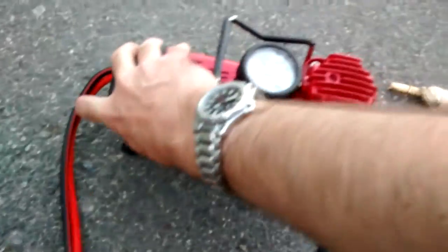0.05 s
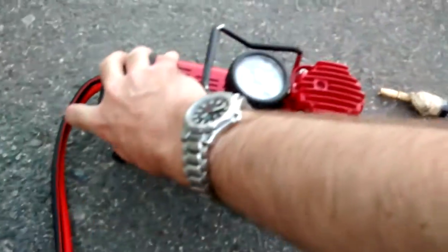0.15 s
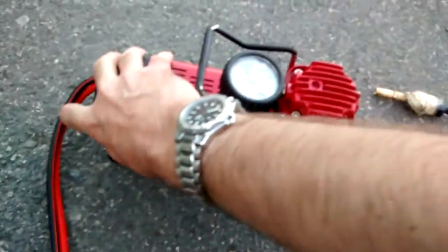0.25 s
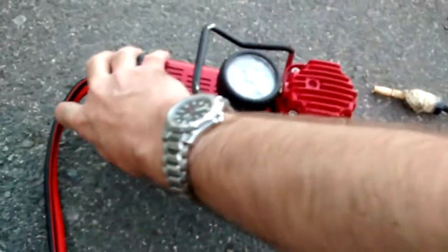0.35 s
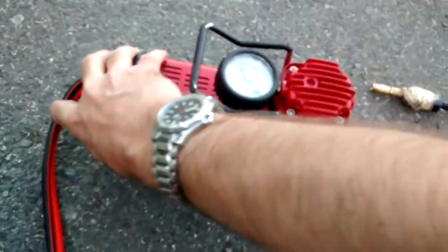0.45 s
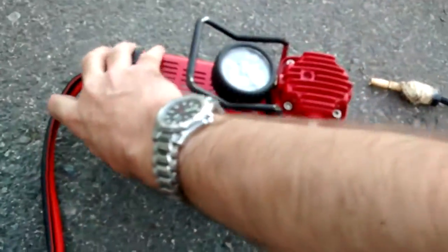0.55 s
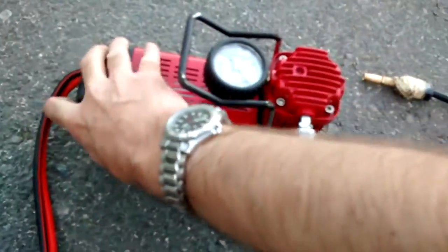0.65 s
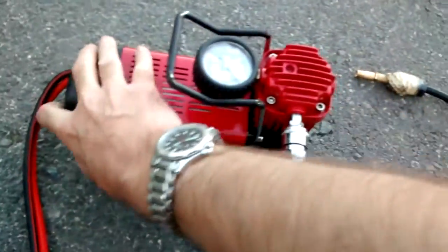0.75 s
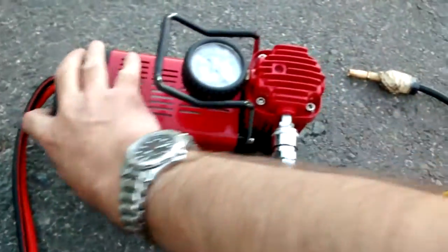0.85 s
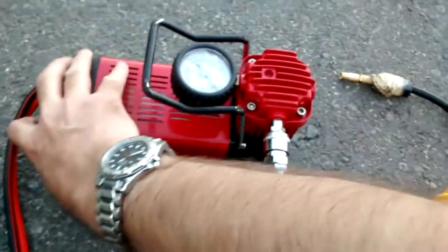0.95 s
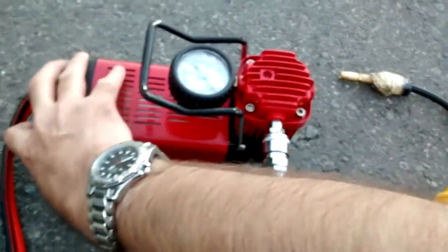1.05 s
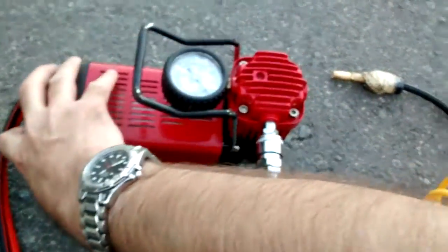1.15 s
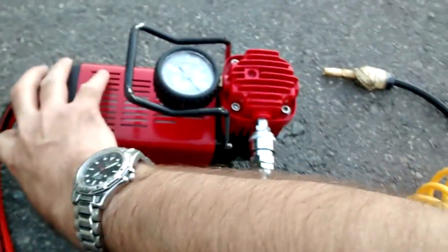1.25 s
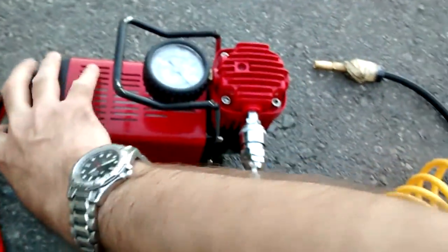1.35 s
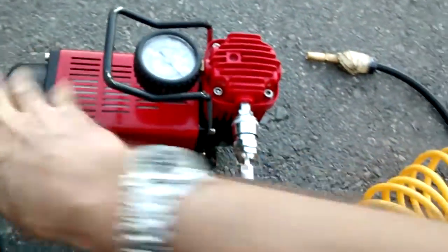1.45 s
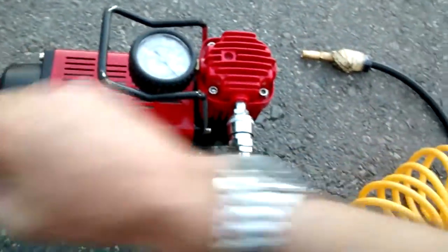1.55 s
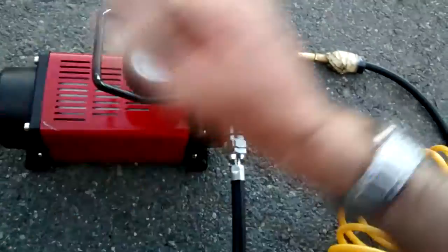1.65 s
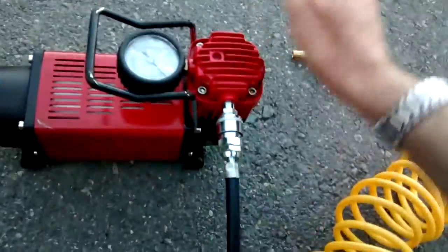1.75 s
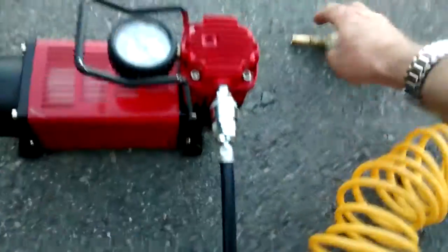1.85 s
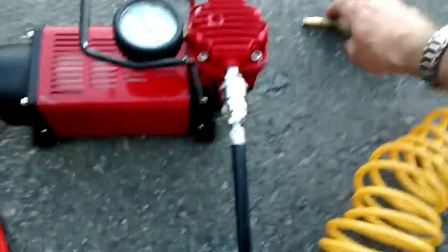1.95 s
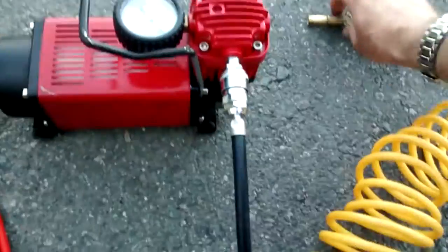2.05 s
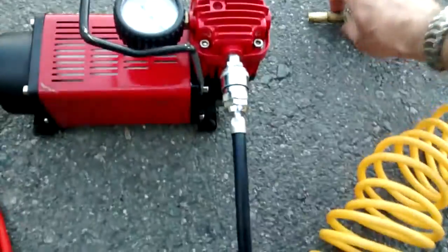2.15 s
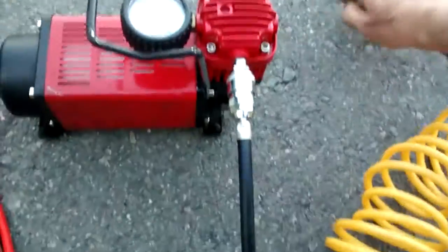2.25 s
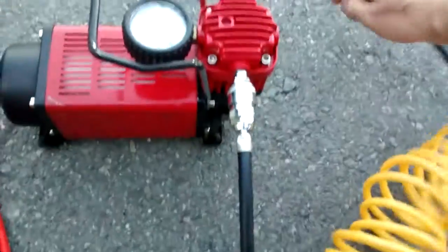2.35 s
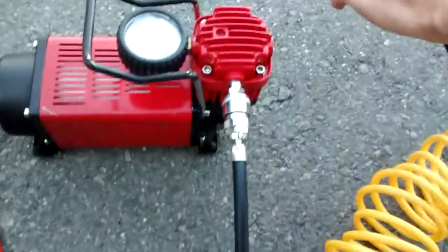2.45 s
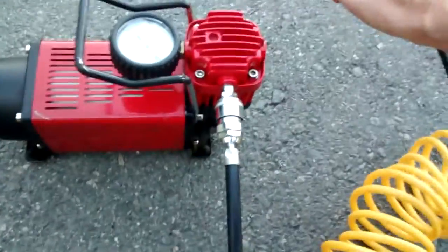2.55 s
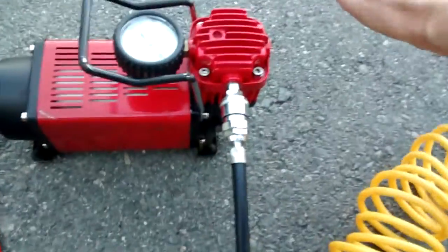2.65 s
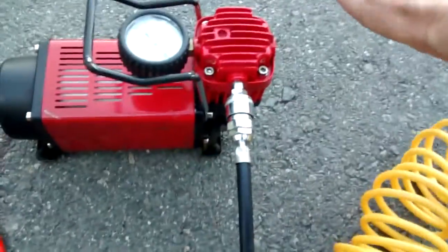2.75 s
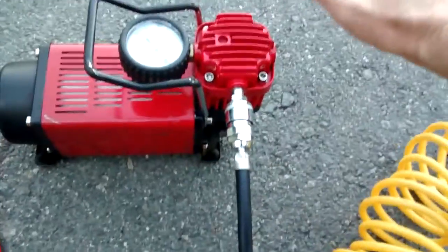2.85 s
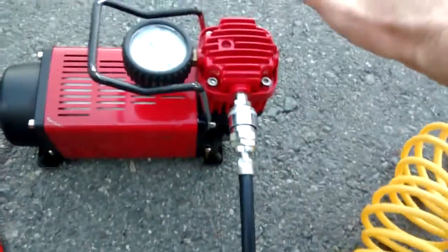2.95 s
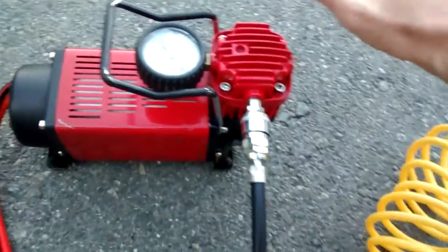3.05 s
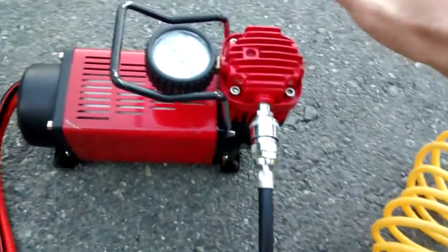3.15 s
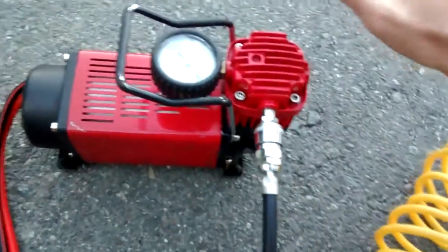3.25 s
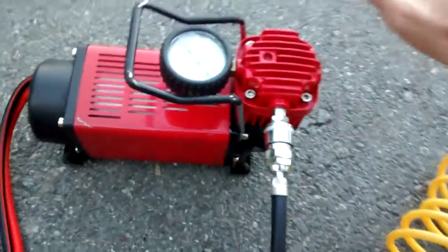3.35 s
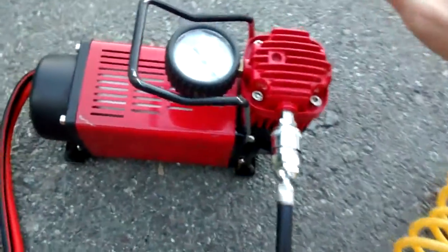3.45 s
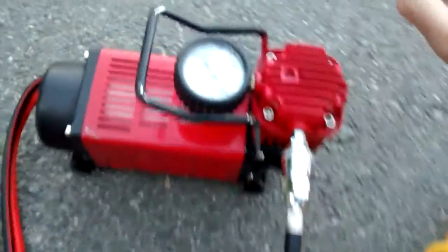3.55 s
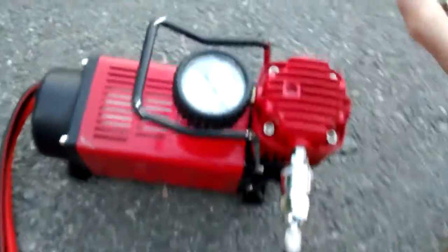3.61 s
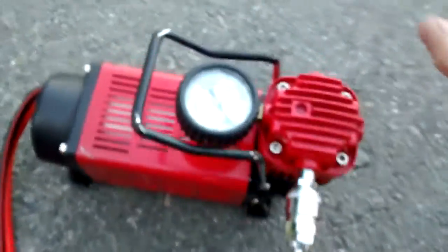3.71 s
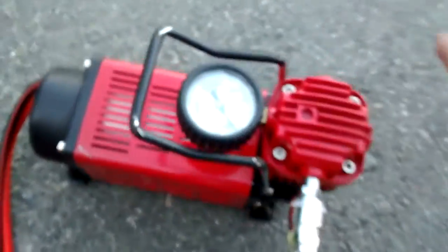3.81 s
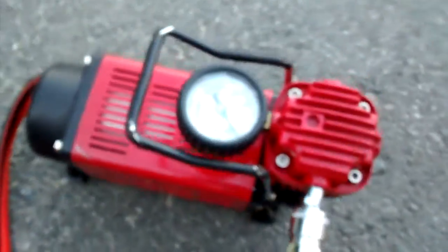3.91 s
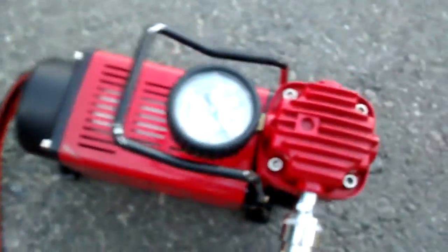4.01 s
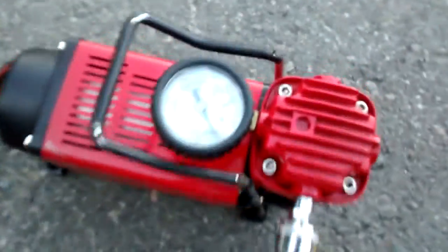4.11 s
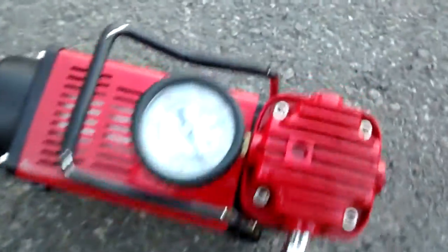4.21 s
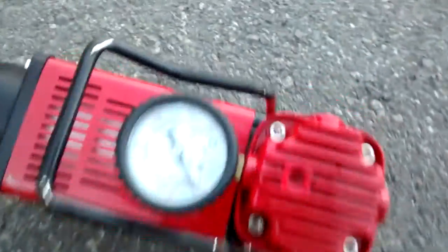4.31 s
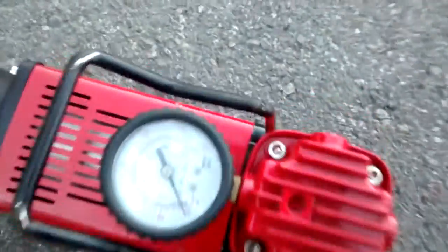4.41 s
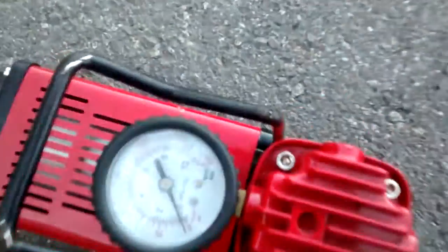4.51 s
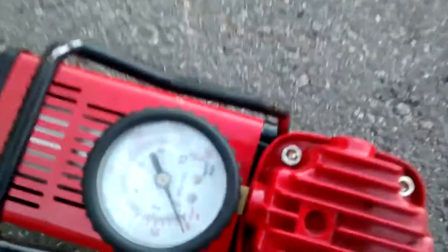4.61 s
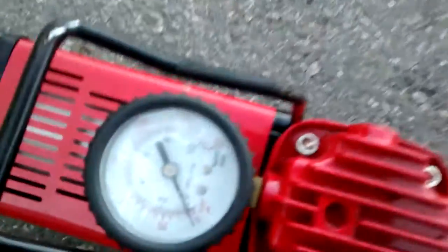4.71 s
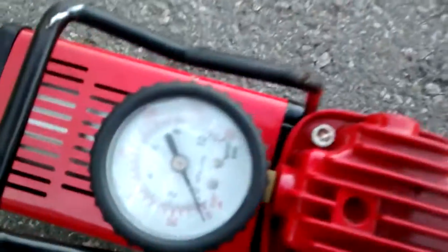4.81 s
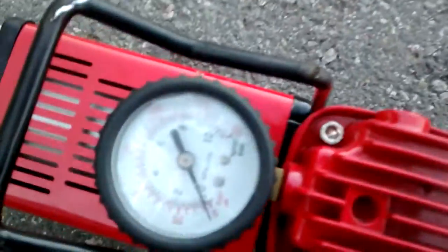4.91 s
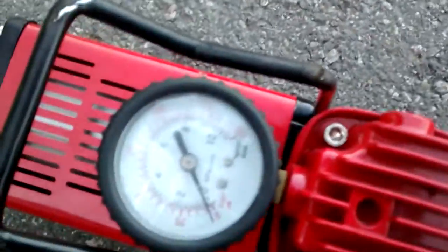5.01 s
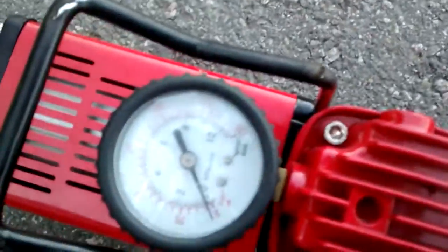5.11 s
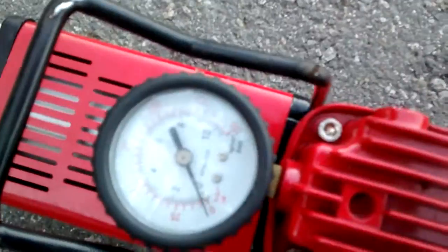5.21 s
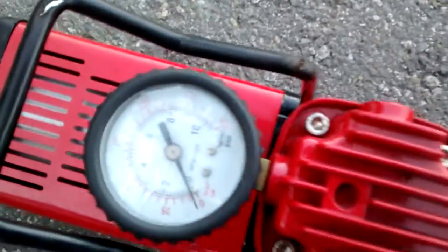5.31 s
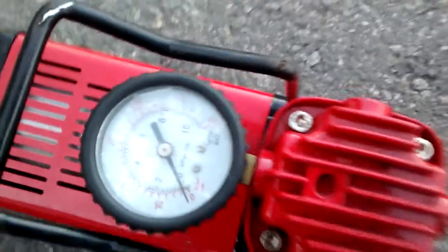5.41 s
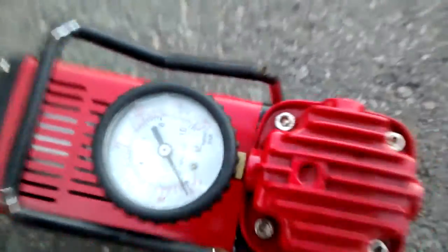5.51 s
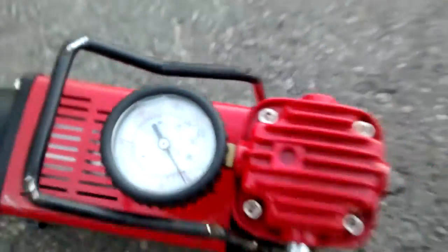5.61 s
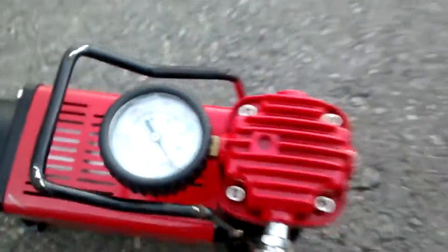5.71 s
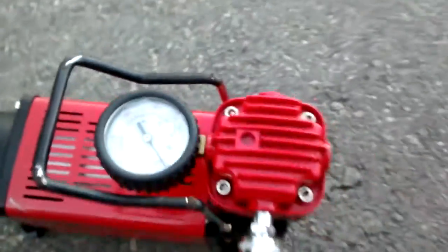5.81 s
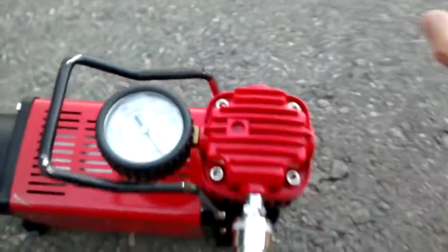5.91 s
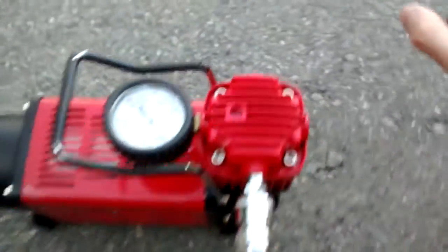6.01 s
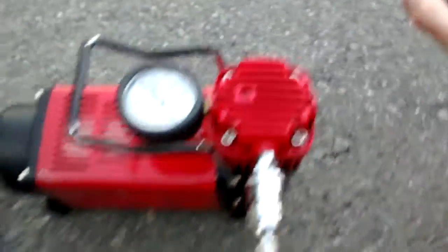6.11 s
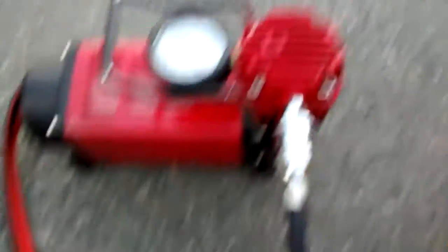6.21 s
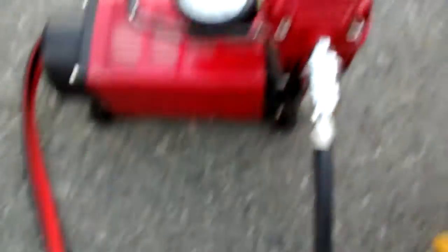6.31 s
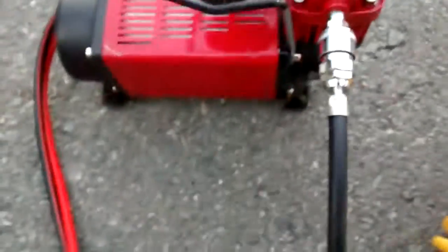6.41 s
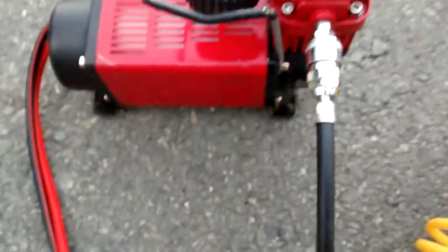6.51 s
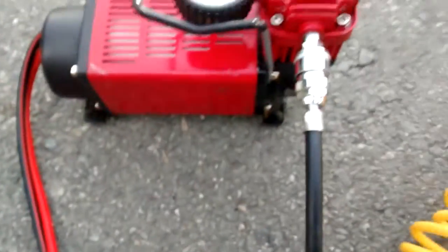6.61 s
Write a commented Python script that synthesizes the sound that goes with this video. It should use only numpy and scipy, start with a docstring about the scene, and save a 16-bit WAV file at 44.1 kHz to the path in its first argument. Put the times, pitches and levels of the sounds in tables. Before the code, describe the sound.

A switch clicks and a small piston air compressor starts almost at once, running unloaded in a loud, steady, buzzing metallic rattle close by outdoors.

```python
"""On the pavement of a quiet street, a small piston air compressor is switched on and runs unloaded.
The switch is a short rattle of noise. Then three blows in every crank turn ring the intake, the hose,
the casing and the valve head, each ring a fading sine wave. Air hisses from the valves as shaped noise.
Two unlike microphone ports, close by and moving, hear it all; a few puffs of air thump on them."""
import sys
import numpy as np
from scipy import signal
from scipy.fft import rfft, irfft
from scipy.io import wavfile
from scipy.ndimage import uniform_filter1d

SR = 44100
rng = np.random.default_rng(int(sys.argv[2]) if len(sys.argv) > 2 else 0)


def bounce(signal):
    """Save signal as a 16-bit WAV file at the path given by the first command-line argument."""
    frames = np.transpose(np.atleast_2d(signal))
    limited = np.clip(frames, -1, 1)
    pcm = np.round(limited * 32767).astype(np.int16)
    wavfile.write(sys.argv[1], SR, pcm)


N = 293706
T = np.arange(N) / SR  # time of every sample, s

# quiet street noise: pitch_hz, level_db (per Hz, relative)
STREET_SPECTRUM = [(18, -40), (30, -4.5), (113, 1), (180, -7.5), (794, -18.5), (2080, -29.5), (2770, -14),
                   (2990, -30), (3500, -24), (4420, -28), (4780, -28), (5170, -29), (15000, -32.5)]
STREET_DB = -47.5
# snaps of the switch: start_s, level_db, t60_s (time to fade by 60 dB)
SWITCH_SNAPS = [(0.4, -19, .02), (0.407, -34, 0.3)]
# resonances of the switch housing: pitch_hz, width_hz, level_db
SWITCH_HOUSING = [(1000, 360, -11), (2110, 270, -11), (4230, 1100, 4), (6100, 2500, 2)]

# the motor starts at ON_S with the crank part way round (turns);
# its speed falls short by a share that fades within about SPIN_UP_S
ON_S, ON_TURN, SHORT, SPIN_UP_S = .4085, .3871, .523, .0533
# running speed creeps up as the pump warms: time_s, speed_turns_per_s
RUNNING_SPEED = [(0.6, 64.915), (0.9, 64.862), (2, 64.978), (3, 65.147), (3.6, 65.253), (4.1, 65.27),
                 (5, 65.333), (6.1, 65.319), (6.7, 65.405)]
# where in the turn the blows fall: intake opens, its flap bounces, outlet valve slams: place_turns
BLOW_PLACES = [0.0077, 0.2416, .4]
# the outlet valve slams late while the motor is slow: ms at first, turns to settle
LATE_MS, LATE_TURNS = 2.2, 3.2
# the blow before the first full turn is faint; the third turn strikes the casing hardest
FIRST_DB, LURCH_DB = -14, 5
LURCH_AT, LURCH_WIDTH = 2.46, .3  # turns

# Rings of each part: pitch_hz, t60_s, lead_ms (how early it starts),
# then opens_db, bounces_db, slams_db (relative strength for each of the three blows)
INTAKE_RINGS = [(52.3, 0.035, 1.6, -22, -64, -13), (205, 0.009, 1.304, -8, -58, -49)]
HOSE_RINGS = [(358, 0.016, -0.47, -14.5, -10, -58), (518, 0.0085, 0.27, -12, -14, -29.5)]
CASING_RINGS = [(887.3, 0.02, 0.042, -12.5, -27.5, -77), (988.9, 0.045, -0.015, -29.5, -60.0, -12),
                (1368, 0.007, -0.0123, -59, -11, -25), (1179, 0.0059, -0.287, -19, -6.5, -16.5)]
COVER_RINGS = [(3264, 0.06, -.3, -40, -43, -11.5), (3465, 0.03, -0.35, -30, -51, -22.5),
               (4730, .015, -0.26, -64, -60, -39)]
REED_RINGS = [(7250, 0.014, -0.312, -51, -64, -28)]
FIN_RINGS = [(7850, 0.05, -.7, -52, -59, -25), (8050, .03, -0.51, -92, -60, -39),
             (8400, 0.033, -0.495, -64, -60, -42), (11000, 0.009, -0.54, -60, -60, -40)]

# loudness of the body as the microphones and hands move: time_s, casing_db, intake_db
BODY_LEVELS = [(0.5, -14.5, -26.5), (0.57, -15, -20), (0.74, -17.0, -25.5), (0.94, -16.0, -23.5),
               (1.49, -16.0, -24.5), (1.67, -16.5, -24), (1.86, -14, -24), (2.12, -13.5, -23),
               (3.5, -14.5, -23.5), (3.77, -14.5, -23.5), (4.4, -12, -22.5), (4.53, -13.0, -23.5),
               (5.37, -12, -22.5), (5.75, -14.0, -24.5), (5.88, -13.5, -23), (6.62, -15.5, -24.5)]
# hose rings against the casing; the lower nearly vanishes around 5 s, the upper changes less:
# time_s, lower_ring_db, upper_ring_db
HOSE_LEVELS = [(.4, -7, -12), (2.2, -9, -20.5), (3.1, -8.5, -18.5), (4.2, -19.5, -18), (5.2, -38, -16),
               (5.7, -24, -16.5), (6.3, -11.5, -15), (6.66, -18, -12.5)]
# the cover's ring, which fades and returns: time_s, level_db
COVER_LEVELS = [(0.5, -33), (0.67, -34), (0.78, -27), (1.58, -27.5), (1.74, -38), (1.87, -22),
                (2.06, -29.5), (2.19, -38.5), (2.28, -29.5), (2.94, -29.0), (3.2, -37.5), (3.45, -27.5),
                (4.6, -27), (5.31, -23.5), (5.54, -28), (6.23, -27), (6.29, -32.5), (6.62, -32)]
# the valve head's rings: time_s, reed_db, fins_db
HEAD_LEVELS = [(0.5, -32.5, -35), (2.14, -34.5, -37), (2.4, -32.5, -29), (3.26, -33.5, -36),
               (3.79, -36, -33), (3.91, -43, -44), (4.28, -42, -36), (4.61, -41.5, -37), (4.8, -39, -29),
               (5.35, -38, -29), (5.5, -41, -40), (5.75, -42.5, -42), (6.2, -31.5, -32), (6.62, -33.5, -35)]

# valve hiss: pitch_hz, level_db (per Hz, relative)
HISS_SPECTRUM = [(1500, -20), (2500, -15), (3300, -5), (4600, -10.5), (6800, -2.5), (8300, -8.5),
                 (9500, -12), (12000, -18), (15500, -26)]
# rough air in intake and casing: pitch_hz, level_db (per Hz, relative)
RUSH_SPECTRUM = [(30, -16), (150, -16), (600, -10.5), (950, -1.5), (1300, -7), (2000, -16.5), (3300, -14),
                 (6000, -34), (9000, -16), (11200, -15), (15500, -24)]
# valve hiss over time, before its spurts: time_s, level_db
HISS_LEVELS = [(0.5, -33.0), (0.87, -29.5), (2.12, -29.5), (2.67, -30.5), (2.71, -30.5), (2.79, -24.5),
               (2.89, -25), (3.87, -27.5), (5.42, -29.5), (5.56, -24), (5.73, -27.5), (6.19, -25.5),
               (6.34, -32.0), (6.62, -30.5)]
# top treble of the hiss, above TOP_HZ, against the rest: time_s, level_db
TOP_LEVELS = [(.5, -11), (1.4, -6.5), (2.5, 7), (2.9, 1), (3.5, 0), (4.2, 2.5), (5.6, -4.5), (6.6, 3)]
TOP_HZ = 9500

# the level of the ringing and hiss drops suddenly and recovers: start_s, depth_db
GAIN_DROPS = [(2.52, -1.5), (2.691, -2), (3.13, -1.5), (3.33, -0.5), (3.47, -0.5), (4.49, -1.5)]
BACK_S = 0.11  # the drop shrinks to about a third in this time
# puffs on the microphones: start_s, level_db (before the swing's shape), swings_per_s
AIR_PUFFS = [(3.77, -36, 35), (6.205, -35, 50), (6.548, -33, 80)]

# right port against left: pitch_hz, level_db, lag_half_cycles, likeness of noise (0 to 1)
RIGHT_PORT = [(30, -18, 2, .6), (62, -10, -.5, 0.6), (129, -6.5, -0.02, 0.46), (247, -0.3, -.17, .6),
              (394, 1.5, -.05, 0.4), (1340, 0.5, 0, 0.82), (1885, 4.5, 0.42, 0.57), (2160, 2.5, 1.55, 0.19),
              (2307, 0.5, 1, 1), (2826, 0.5, 1, 1), (3377, 3, 2.08, 0.92), (3930, 2, 2, 0.6),
              (5420, -4.5, 4, 1), (7240, -16, 4, 0.45), (8220, -13.5, 6, .3), (10100, -10, 7, 0.15),
              (14900, -12, 11, .1)]
# the microphones turn a little: time_s, left_minus_right_db
TURNING = [(.5, 0), (1.7, 1.2), (2.2, -0.1), (3.2, 1.1), (4.2, 0.2), (5.2, -0.95), (5.7, 0.6), (6.66, 0.1)]
EDGE_HZ = 15450  # upper edge of the band


def gain_of(db):
    """Turn decibels into a factor."""
    return 10 ** (np.asarray(db) / 20)


def evened(x):
    """Scale a sound to an average strength (rms) of one."""
    return x / np.sqrt(np.mean(x ** 2) + 1e-20)


def read(points, hz, order=1):
    """Read one column of a table over frequency, on a log axis."""
    points = np.asarray(points)
    return np.interp(np.log(hz + 1), np.log(points[:, 0] + 1), points[:, order])


def curve(rows, order=1):
    """Read one column of a table over time, joined by straight lines."""
    rows = np.asarray(rows)
    return np.interp(T, rows[:, 0], rows[:, order])


def noise(spectrum, patchy_db):
    """Two unrelated noises of one spectrum, sharing patches that drift louder and softer."""
    hz = np.fft.rfftfreq(1024, 1 / SR)
    a, b, c, d, patches = rng.standard_normal((N // 256 + 5, 513, 5)).T
    patches = uniform_filter1d(patches, 14, 0)  # smooth over frequency
    patches = evened(uniform_filter1d(patches, 20, 1))  # smooth over time
    level_db = read(spectrum, hz)[:, None] + patchy_db * patches
    z = np.array([a + 1j * b, c + 1j * d]) * gain_of(level_db)
    return evened(signal.istft(z, nperseg=1024, noverlap=768)[1][:, :N])


def street():
    """The quiet street: steady, slightly patchy noise, different in each port."""
    return gain_of(STREET_DB) * noise(STREET_SPECTRUM, patchy_db=0.5)


def switch():
    """The rocker switch snaps over and bounces: short rattles coloured by its housing."""
    hz = np.fft.rfftfreq(N, 1 / SR)
    housing = sum(gain_of(db) / (1 + 2j * (hz - f) / width) for f, width, db in SWITCH_HOUSING)
    rattle = evened(irfft(rfft(rng.standard_normal(N)) * housing, N))
    loudness = 0
    for start, db, t60 in SWITCH_SNAPS:
        # a very quick rise up to the snap, then a fade
        away = np.where(T > start, (T - start) / t60, (start - T) / 0.0046)
        loudness = loudness + gain_of(db - 60 * away)
    return rattle * loudness


def crank():
    """Position of the crank in turns: its speed, slow at first, added up over time."""
    since = np.maximum(T - ON_S, 0)
    spin_up = 1 - SHORT * np.exp(-(since / SPIN_UP_S) ** 2)
    speed = curve(RUNNING_SPEED) * spin_up * (since > 0)
    return ON_TURN + np.cumsum(speed) / SR


def rung(modes, chance, jitter_ms, jitter_db, rise_ms, lurch_db=0):
    """Every blow, a little early or late and uneven in strength, rings the given modes."""
    turns = crank()
    place = np.arange(len(chance))[:, None] + BLOW_PLACES
    late_ms = LATE_MS * np.exp(-(place / LATE_TURNS) ** 4) * [0, 0, 1]  # outlet valve only
    when = np.interp(place, turns, T) + (jitter_ms * chance[..., 0] + late_ms) / 1000

    lurch = lurch_db * np.exp(-((place - LURCH_AT) / LURCH_WIDTH) ** 2)
    start_db = FIRST_DB * (place < 1) + lurch
    happens = (place >= turns[0]) * (place < turns[-1])
    force = gain_of(jitter_db * chance[..., 1] + start_db) * happens

    t, out = np.arange(3072) / SR, np.zeros(N)
    for hz, t60, lead_ms, *blow_db in modes:
        at = np.maximum((when - lead_ms / 1000) * SR, 0).ravel()
        size = (force * gain_of(blow_db)).ravel()
        # share each blow between the two nearest samples
        whole = at.astype(int)
        part = at - whole
        train = np.bincount(whole, size * (1 - part), N + SR)
        train = train + np.bincount(whole + 1, size * part, N + SR)
        ring = -gain_of(-60 * t / t60) * np.sin(2 * np.pi * hz * t)  # each blow starts as a suction
        ring = ring * (1 - np.exp(-1000 * t / rise_ms))
        out += signal.oaconvolve(train[:N], ring)[:N]
    return evened(out)


def waver(db, per_s):
    """A slow random drift in dB: a sum of slow waves, the faster ones weaker."""
    slow_t = T[::64]
    drift = 0
    for f in per_s * np.geomspace(1, 10, num=20):
        drift = drift + np.sin(2 * np.pi * (f * slow_t + rng.random())) / np.sqrt(f)
    return db * np.repeat(evened(drift), 64)[:N]


def body(chance):
    """Casing, intake and hose ring with the blows of air, sharing their small unevenness."""
    casing_db = curve(BODY_LEVELS)
    casing = rung(CASING_RINGS, chance, jitter_ms=0.014, jitter_db=0.6, rise_ms=.005, lurch_db=LURCH_DB)
    intake = rung(INTAKE_RINGS, chance, jitter_ms=.012, jitter_db=0.25, rise_ms=.005)
    out = gain_of(casing_db) * casing + gain_of(curve(BODY_LEVELS, order=2)) * intake
    for k, mode in enumerate(HOSE_RINGS):
        hose = rung([mode], chance, jitter_ms=0.009, jitter_db=0.0, rise_ms=.005)
        out = out + gain_of(casing_db + curve(HOSE_LEVELS, order=k + 1)) * hose
    soften = signal.butter(4, 2100., fs=SR, output="sos")
    return signal.sosfiltfilt(soften, out)  # blows of air have soft edges


def valve_head(chances):
    """Cover, reed and fins: small stiff parts that build up slowly and are struck less evenly."""
    cover = rung(COVER_RINGS, chances[0], jitter_ms=0.012, jitter_db=1.0, rise_ms=0.48)
    reed = rung(REED_RINGS, chances[1], jitter_ms=0.016, jitter_db=2.2, rise_ms=0.25)
    fins = rung(FIN_RINGS, chances[2], jitter_ms=0.01, jitter_db=1.5, rise_ms=.5)
    cover_db = curve(COVER_LEVELS) + waver(db=.4, per_s=1.5)
    reed_db = curve(HEAD_LEVELS) + waver(db=2.0, per_s=1.5)
    fins_db = curve(HEAD_LEVELS, order=2) + waver(db=1.6, per_s=1.5)
    return gain_of(cover_db) * cover + gain_of(reed_db) * reed + gain_of(fins_db) * fins


def pump():
    """All the ringing parts, with random timing and strength drawn for every blow."""
    air, *metal = rng.standard_normal((4, int(crank()[-1]) + 1, len(BLOW_PLACES), 2))
    return body(air) + valve_head(metal)


def hiss():
    """Air through the valves spurts once a turn, at the outlet slam's usual place; air rushes in the casing."""
    turns = crank()
    since = (turns - BLOW_PLACES[2]) % 1  # turns since that place
    spurt = 1 + 0.9 * np.exp(-since / 0.046) + 0.11 * np.exp(-since / 0.21)
    valves = gain_of(curve(HISS_LEVELS)) * spurt * noise(HISS_SPECTRUM, patchy_db=1.1)
    keep_top = signal.butter(3, TOP_HZ, "highpass", fs=SR, output="sos")
    top = signal.sosfiltfilt(keep_top, valves)
    top_change = (gain_of(curve(TOP_LEVELS)) - 1) * top

    swell = 1 + .5 * np.exp(-since / 0.11)
    rush = gain_of(curve(BODY_LEVELS) - 19.5) * swell * noise(RUSH_SPECTRUM, patchy_db=1.3)
    faint_start = gain_of(FIRST_DB * np.clip(1.5 - turns, 0, 1))
    return (T > ON_S) * faint_start * (valves + top_change + rush)


def gain_drops():
    """Gain of the sudden drops in level: down within 10 ms, then a smooth recovery."""
    total_db = 0
    for start, db in GAIN_DROPS:
        onset = np.clip((T - start) * 100, 0, 1)
        total_db = total_db + db * np.exp(-np.maximum(T - start, 0) / BACK_S) * onset
    return gain_of(total_db)


def puffs():
    """Moving air pushes both membranes alike for one slow swing."""
    out = 0
    for start, db, hz in AIR_PUFFS:
        u = np.clip((T - start) * hz, 0, 1)  # progress through the swing
        out = out + gain_of(db) * np.sin(2 * np.pi * u) * np.sin(np.pi * u)
    return out


def ports(same, other=None):
    """Left port takes the sound as it is; the right colours and shifts it, noise only partly alike."""
    hz = np.fft.rfftfreq(N, 1 / SR)
    z = rfft(same)
    if other is not None:
        like = np.clip(read(RIGHT_PORT, hz, order=3), 0, 1)
        z = like * z + np.sqrt(1 - like ** 2) * rfft(other)
    shift = np.exp(-1j * np.pi * read(RIGHT_PORT, hz, order=2))
    z = z * gain_of(read(RIGHT_PORT, hz)) * shift
    return np.array([same, irfft(z, N)])


def scene():
    """Street, switch, ringing and air through the two turning ports, with puffs on top."""
    quiet_street = street()
    drops = gain_drops()
    clear = ports(switch() + drops * pump())
    noisy = ports(*(quiet_street + drops * hiss()))
    balance = gain_of(curve(TURNING) * [[.5], [-.5]])  # half the difference to each side
    return (clear + noisy) * balance + puffs()


def record(dry):
    """The microphone loses the deep bass, peaks beyond full scale clip; then the band limit."""
    thin = signal.sosfilt(signal.butter(1, 60., "highpass", fs=SR, output="sos"), dry)
    clipped = np.clip(thin, -1, 1)
    band = signal.firwin(511, EDGE_HZ, window=("kaiser", 9), fs=SR)
    return signal.oaconvolve(clipped, band[None], "same")


dry = scene()
out = record(dry)
bounce(out)
```